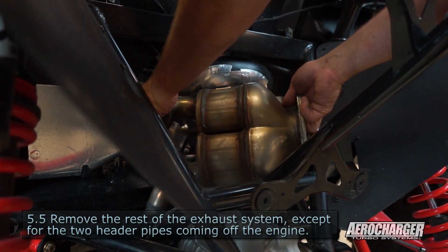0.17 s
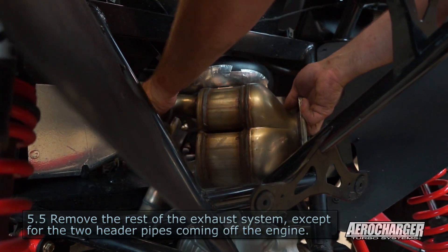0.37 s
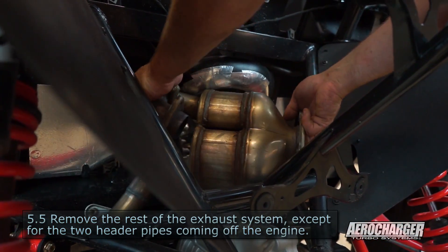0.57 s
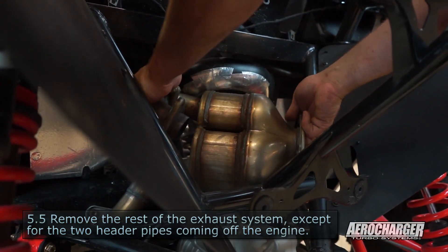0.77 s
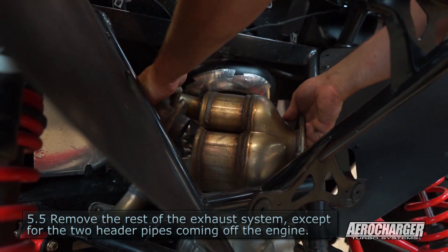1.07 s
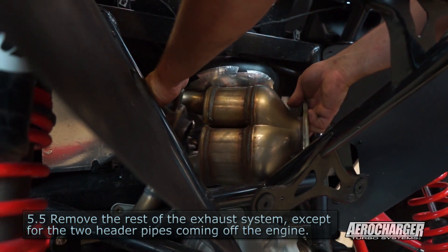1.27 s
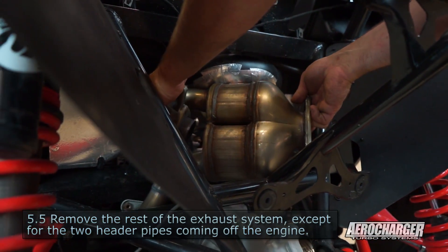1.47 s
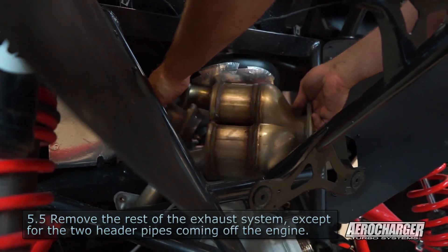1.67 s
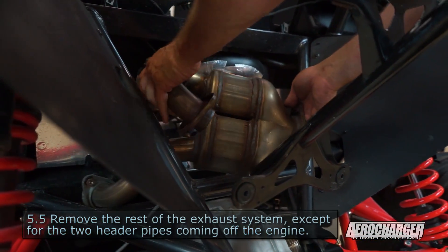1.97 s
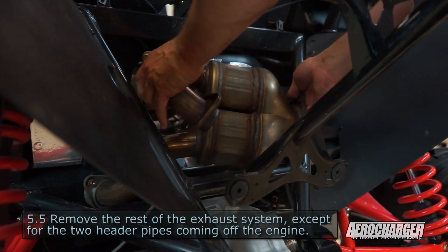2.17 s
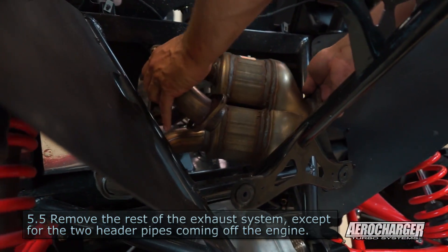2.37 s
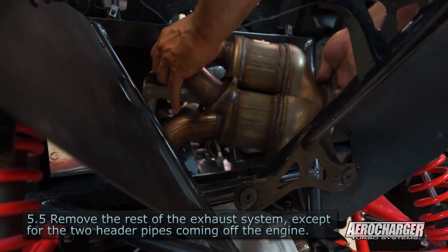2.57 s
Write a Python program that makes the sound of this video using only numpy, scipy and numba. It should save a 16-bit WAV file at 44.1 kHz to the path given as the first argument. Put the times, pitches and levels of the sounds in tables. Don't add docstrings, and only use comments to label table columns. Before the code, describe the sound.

A hollow steel exhaust clanks and scrapes against a metal frame in a quiet garage, loudest around half a second, one and two seconds, with short dull rings, close microphone, faint room tail and low hum.

```python
import sys
import numpy as np
from scipy import signal
from scipy.fft import rfft, irfft
from scipy.io import wavfile
from scipy.ndimage import uniform_filter1d
from numba import njit

SR = 44100
rng = np.random.default_rng(int(sys.argv[2]) if len(sys.argv) > 2 else 0)


def bounce(signal):
    frames = np.transpose(np.atleast_2d(signal))
    limited = np.clip(frames, -1, 1)
    pcm = np.round(limited * 32767).astype(np.int16)
    wavfile.write(sys.argv[1], SR, pcm)


def linear_from_db(decibels):
    return 10 ** (np.asarray(decibels, float) / 20)


N = 121275

# [f/Hz, level/dB per Hz]
AIR_COLOUR = [
    (25, 4),
    (60, 2.5),
    (118, 8),
    (220, -3),
    (700, -18),
    (1500, -33),
    (5000, -23),
    (16000, -38.5),
]
# [t/s, length/s, stick-slip level/dB, hiss level/dB]
SLIDES = [(0.134, 0.073, -46, -56), (0.411, 0.17, -43.5, -53.5), (1.065, 0.34, -42.5, -62),
          (1.162, 0.37, -48, -74), (1.542, 0.16, -45.5, -81), (1.843, 0.2, -51.5, -55.5),
          (1.931, .1, -51.5, -73), (2.29, 0.17, -43.5, -73), (0.495, .17, -28.5, -62),
          (2.043, 0.19, -39, -64), (-.06, 0.16, -55.5, -81), (0.622, 0.25, -51, -70),
          (0.884, 0.24, -51.5, -66), (1.31, 0.58, -65, -63), (1.659, 0.25, -51.5, -63)]
# [t/s, level/dB, decay/s, centre f/Hz]
GRIT_TICKS = [
    (.055, -55, .008, 9000),
    (.973, -44.5, .008, 12000),
    (1.713, -45, .005, 7000),
    (1.722, -38, .007, 13000),
    (1.746, -39, .006, 9000),
    (1.885, -54, .012, 14000),
    (2.365, -61, 0.0041, 13000),
    (2.7246, -53, .012, 11000),
]
# [t/s, peak level/dB, treble level/dB against the whole, chatter/s, favoured f/Hz]
EARLY_CLINKS = [(0.1029, -28, -27.5, 0.011, 1250), (0.2028, -16, -24, 0.024, 1230),
                (0.2206, -15.5, -12.5, 0.025, 1210), (0.231, -13.5, -22.5, 0.0036, 1320),
                (0.2567, -17, -22, 0.0035, 1160), (0.3278, -15.5, -21, 0.0049, 1430),
                (0.476, -16, -21.5, 0.033, 1620), (0.5026, -7, -23, 0.049, 1420),
                (0.5193, -8, -16, 0.037, 1300), (0.5399, -2.5, -19.5, 0.023, 1260),
                (0.5982, -8, -17, 0.025, 1070), (0.6179, -10, -16.5, 0.0075, 1830),
                (0.932, -23, -24, 0.0067, 1310), (0.9849, -19, -24.5, 0.01, 2940),
                (1.1318, -5, -15, 0.014, 1710), (1.1664, -6.5, -19.5, 0.021, 4660),
                (1.2383, -16, -25, 0.016, 1970), (1.2977, -18.5, -21.5, 0.0044, 1415)]
LATE_CLINKS = [(1.4868, -17.5, -18.5, 0.0018, 4540), (1.5076, -10, -20, 0.019, 1230),
               (1.5287, -10, -17, 0.012, 4270), (1.5892, -29, -25, 0.002, 1720),
               (1.687, -23.5, -27, 0.013, 2000), (1.7309, -19, -21, 0.006, 1320),
               (1.7611, -15.5, -21.5, 0.0056, 2500), (1.7712, -12, -24.5, 0.021, 1440),
               (1.866, -22.5, -26.5, 0.015, 1390), (1.951, -27.5, -27, 0.0095, 1440),
               (2.0147, -26, -31.5, 0.0086, 1350), (2.1198, -6.5, -12.5, 0.0097, 3200),
               (2.3042, -14.5, -17.5, 0.0086, 1930), (2.7228, -44, -4.5, 0.0069, 3200)]
# [t/s, peak level/dB, treble level/dB against the whole, chatter/s, favoured f/Hz]
TOUCHES = [(2.069, -29.5, -46.5, 0.016, 1240), (2.0845, -7, -15, 0.0024, 1140),
           (2.0867, -3, -12, 0.0031, 1710), (2.091, -5, -13.5, .006, 3280), (2.1, -4.5, -18.5, 0.011, 1270),
           (2.112, -10, -16.5, .008, 1750), (2.148, -9.5, -18, 0.028, 3120),
           (2.175, -16, -27.5, 0.019, 1290), (2.189, -22, -15, 0.037, 2840), (2.215, -24, -15, .012, 3300),
           (2.284, -26, -14, 0.015, 3180), (2.291, -28.5, -24, 0.0069, 1860), (2.328, -26, -24, 0.01, 1270),
           (2.4525, -20.5, -8.5, 0.008, 2200), (2.4549, -22, -25.5, 0.005, 1620),
           (2.459, -18.5, -17.5, 0.016, 3200), (0.876, -20.5, -30, 0.0084, 2230),
           (0.5454, -13.5, -5.5, 0.0077, 4320), (0.559, -9.5, -34, 0.017, 1210),
           (1.9805, -36, -35, 0.0038, 1690), (1.9971, -25, -31.5, 0.014, 3270),
           (1.491, -20, -34, 0.011, 2840), (1.872, -22.5, -25, 0.003, 3200), (0.468, -28.5, -25, .01, 1520)]
# [level/dB, t60/s]
CANISTER_HZ = [1192, 1268, 1296, 1330, 1556, 1655, 1825, 2235, 2311, 2435, 2918, 2893, 3225, 2963]
CANISTER_RING = [(-5.5, 0.13), (-3, 0.084), (-6.5, 0.16), (-4.5, 0.077), (-8, 0.12), (0.5, 0.078),
                 (-2, 0.14), (-7, 0.14), (-14.5, 0.15), (-10, 0.23), (-11.5, 0.19), (-11.5, 0.18),
                 (-5, 0.092), (-12, 0.21)]
# [level/dB, t60/s]
PIPES_HZ = [2509, 3620, 4245, 4320, 4573, 5024, 6200, 6592, 6700, 8425, 8560, 7986, 9496, 4987]
PIPES_RING = [(-17.5, 0.19), (-18, 0.11), (-17.5, 0.12), (-6.5, 0.17), (-16, 0.32), (-22.5, 0.83),
              (-27.5, 0.4), (-20.5, .22), (-19.5, 0.26), (-30, 0.081), (-15.5, 0.1), (-37, 0.17),
              (-21, 0.2), (-29, 0.21)]
# [f/Hz, level/dB]
SHEET_COLOUR = [(300, -24), (1200, -12), (2000, -20), (3300, -13.5), (5000, -18), (9500, -23.5),
                (12000, -30), (16000, -40)]
# [t/s, level/dB, f/Hz, t60/s]
PINGS = [(.104, -39, 2240, 0.14), (.329, -30.5, 4560, 0.2), (.5385, -8, 586, 0.048),
         (.879, -32, 2285, 0.098), (.986, -24, 1652, 0.14), (1.145, -18.5, 1815, .16),
         (2.13, -22.5, 1269, 0.34), (2.4525, -24.5, 2246, 0.14), (2.454, -28.5, 2925, 0.23),
         (2.455, -25.5, 1303, 0.14), (2.7246, -49.5, 3140, 0.071)]
# [t/s, peak level/dB, chatter/s, favoured f/Hz]
BUMPS = [(0.22, -14, 0.026, 546), (0.259, -19.5, 0.072, 215), (0.503, -7, 0.015, 280),
         (0.519, -8, 0.0059, 177), (0.539, -4, 0.0052, 567), (0.599, -19.5, 0.036, 355),
         (0.878, -28, 0.078, 430), (0.933, -15.5, 0.033, 490), (1.133, -5, 0.014, 532),
         (1.169, -11, 0.06, 460), (1.239, -20, 0.046, 392), (1.488, -27, 0.009, 353),
         (1.507, -11.5, 0.026, 670), (1.711, -20.5, 0.019, 240), (1.761, -16.5, 0.046, 184),
         (1.946, -22, 0.07, 191), (2.083, -20.5, 0.052, 700), (2.306, -14, 0.026, 867),
         (2.329, -35, 0.025, 537), (2.369, -19.5, 0.077, 127), (0.679, -28, .06, 205), (.76, -32, .06, 210),
         (1.142, -9.5, 0.016, 278), (1.776, -23.5, 0.0086, 597)]
# [f/Hz, level/dB, t60/s]
FRAME_MODES = [(127, -9.5, 0.51), (190.5, -4, 0.16), (244, -2, 0.088), (278.7, -5.5, 0.13), (370, -8, 0.1),
               (417.3, -8, 0.17), (480.2, -4, 0.06), (542.6, -6, 0.087), (584, -15, 0.11), (639, 0, 0.039),
               (755, -5, 0.086), (827, -3, 0.047), (332, -10, 0.089)]
# [t/s, share of ringing left, length/s]
MUTES = [
    (2.126, 0.74, 0.0031),
    (2.23, 0.55, 0.0069),
    (3, .45, .004),
    (1.8, 0.65, 0.008),
    (0.48, 1, 0.0092),
    (1.553, 0.61, 0.0058),
    (0.672, 0.7, 0.03),
    (1.785, 0.82, .004),
    (.91, 1, 0.013),
]

AIR_DB, HUM_HZ, HUM_DB = -49, 123, -73
DRAG_PER_S, GRAIN_DB = 4000, 2
DRAG_DB, DRAG_FRAME_DB = -32, -26.5
CLINK_DB, BUMP_DB = -18, -14.5
CHATTER_PER_S, CHATTER_DB, RISE_S = 5000, 2.5, 0.00017
TOUCH, TOUCH_SAMPLES = 6, 2
SPOT_DB, SPOT_OCTAVES, SCATTER_DB = 8, 0.21, 3.5
USUAL_TREBLE_DB, TREBLE_HZ = -21.5, 2840
CRASH = 0.21
TWIN_SHARE, TWIN_DB, TWIN_T60 = 0.0097, -4.5, 0.52
SHEET_T60_S, SHEET_DAMP = 0.099, 0.14
JOLT_DB, JOLT_HZ = -29, 33
PING_RISE_S = 0.0012
BASS_CUT_HZ = 119
ROOM_DB, ROOM_T60_S, ROOM_HZ = -20.5, 0.54, 5200


def colour(x, points):
    hz, db = np.array(points, float).T
    bins_hz = np.maximum(np.fft.rfftfreq(len(x), 1 / SR), 1)
    gain = linear_from_db(np.interp(np.log(bins_hz), np.log(hz), db))
    return irfft(rfft(x) * gain, len(x))


def unit(x):
    return x / np.sqrt(np.mean(x ** 2))


def garage():
    t = np.arange(N) / SR
    air = linear_from_db(AIR_DB) * unit(colour(rng.standard_normal(N), AIR_COLOUR))
    waver = unit(uniform_filter1d(rng.standard_normal(N), SR // 8))
    return air + linear_from_db(HUM_DB + 2 * waver) * np.sin(2 * np.pi * HUM_HZ * t)


def clicks(shape, per_s):
    u = rng.random(shape + (2,))
    chance = per_s / SR
    sign = np.where(u[..., 0] < chance / 2, 1, -1)
    size = linear_from_db(-CHATTER_DB * np.log(1 - u[..., 1]))
    return size * sign * np.clip((chance - u[..., 0]) * 1e5, 0, 1)


def drag():
    start, length, db, hiss_db = np.array(SLIDES, float).T[..., None]
    hump = np.sin(np.pi * np.clip((np.arange(N) / SR - start) / length, 0, 1))
    grain = linear_from_db(GRAIN_DB * unit(uniform_filter1d(rng.standard_normal(N), SR // 100)))
    hiss_colour = [(3000, -16), (6000, -3), (10000, 7), (15000, -4), (16000, -12)]
    hiss = unit(colour(rng.standard_normal(N), hiss_colour))
    ticks = grain * (hump * linear_from_db(db)).sum(0) * unit(clicks((N,), DRAG_PER_S))
    return ticks, (hump * linear_from_db(hiss_db)).sum(0) * hiss


def grit():
    out, t = np.zeros(N + SR // 10), np.arange(SR // 10) / SR
    for s, db, decay, hz in GRIT_TICKS:
        puff_colour = [(hz / 4, -30), (hz / 1.6, -6), (hz, 0), (hz * 2, -8)]
        puff = unit(colour(rng.standard_normal(len(t)), puff_colour))
        first = int(s * SR)
        out[first:first + len(t)] += linear_from_db(db) * puff * np.exp(-t / decay)
    return out[:N]


def chatter(length_s):
    t, fade_s = np.arange(SR // 10) / SR, np.clip(length_s, .002, .06)[:, None]
    x = clicks((len(fade_s), len(t)), CHATTER_PER_S)
    x = x * (1 - np.exp(-t / RISE_S)) * np.exp(-(t / fade_s) ** 0.76)
    x[:, 8:8 + TOUCH_SAMPLES] += TOUCH * np.hanning(TOUCH_SAMPLES + 2)[1:-1] / 1.71
    return x / np.sqrt(np.sum(x ** 2, axis=1, keepdims=True))


@njit
def ring(starts, pushes, gains, steady, steady_gain, poles, left):
    n, out = len(steady), np.zeros(len(steady))
    for m in range(len(poles)):
        x, z = steady * steady_gain[m], 0j
        for e in range(len(starts)):
            k = min(pushes.shape[1], n - starts[e])
            x[starts[e]:starts[e] + k] += gains[e, m] * pushes[e, :k]
        for i in range(n):
            z = z * poles[m] * left[i] + x[i]
            out[i] += z.imag
    return out


def body(modes, s, db, length_s, spot_hz, treble_db, steady, tuned, left):
    hz, mode_db, t60 = np.array(modes, float).T
    chance = rng.standard_normal((len(s) + 1, 2, len(hz)))
    octaves = np.log2(hz / spot_hz[:, None])
    where = SPOT_DB * np.exp(-(octaves / SPOT_OCTAVES) ** 2) + SCATTER_DB * chance[1:, 0]
    slope = np.clip(np.log2(hz / TREBLE_HZ) / 1.44, -.5, 1.7)
    tilt = (treble_db[:, None] - USUAL_TREBLE_DB) * slope
    tilt = tilt + CRASH * (db - db.max())[:, None] * (np.arange(len(hz)) >= tuned)
    poles = np.exp(2j * np.pi * hz / SR - np.log(1000) / (np.maximum(t60, .01) * SR))
    sign = np.sign(chance[:, 1])
    gains = sign[1:] * linear_from_db(db[:, None] + mode_db + where + tilt)
    starts = (s * SR).astype(np.int64)
    steady = steady + 1e-18
    return ring(starts, chatter(length_s), gains, steady, sign[0] * linear_from_db(mode_db), poles, left)


def twinned(modes, spread):
    offset = TWIN_SHARE * (rng.random(len(modes)) + 0.3)
    shift = 1 + spread * offset * np.where(rng.random(len(modes)) < .5, 1, -1)
    return modes + [(f * k, db + TWIN_DB, t60 * TWIN_T60) for (f, db, t60), k in zip(modes, shift)]


def sheet():
    u = rng.random((3, 250))
    points_hz, points_db = np.array(SHEET_COLOUR, float).T
    hz = 300 * 53 ** ((np.arange(250) + u[0]) / 250) ** .6
    db = np.interp(np.log(hz), np.log(points_hz), points_db) + 6 * (u[1] - .5)
    return list(zip(hz, db, SHEET_T60_S * (2000 / hz) ** SHEET_DAMP * (0.17 + u[2])))


def exhaust(ticks):
    s, db, treble_db, length_s, spot_hz = np.array(EARLY_CLINKS + LATE_CLINKS + TOUCHES, float).T
    tuned = [(f, *m) for f, m in zip(CANISTER_HZ + PIPES_HZ, CANISTER_RING + PIPES_RING)]
    modes = twinned(tuned, 0.62) + sheet()
    return body(modes, s, db + CLINK_DB, length_s, spot_hz, treble_db,
                ticks * linear_from_db(DRAG_DB), 2 * len(tuned), muting())


def jolt():
    s, db = np.array(EARLY_CLINKS + LATE_CLINKS + TOUCHES, float).T[:2]
    x = np.zeros(N)
    x[(s * SR).astype(int)] = linear_from_db(db)
    band = signal.butter(2, [JOLT_HZ / 2, JOLT_HZ * 1.25], "band", fs=SR)
    return linear_from_db(JOLT_DB) * SR / JOLT_HZ / 2 * signal.lfilter(*band, x)


def pings():
    s, db, hz, t60 = np.array(PINGS, float).T[..., None]
    t = np.maximum(np.arange(N) / SR - s, 0)
    swell = linear_from_db(db) * (1 - np.exp(-t / PING_RISE_S))
    fade = np.exp(-np.log(1000) * t / t60)
    return (swell * fade * np.sin(2 * np.pi * hz * t)).sum(0)


def frame(ticks):
    s, db, length_s, spot_hz = np.array(BUMPS, float).T
    treble_db = np.full(len(s), float(USUAL_TREBLE_DB))
    return body(twinned(FRAME_MODES, 8.1), s, db + BUMP_DB, length_s, spot_hz, treble_db,
                ticks * linear_from_db(DRAG_FRAME_DB), 2 * len(FRAME_MODES), np.ones(N))


def muting():
    start, left, length = np.array(MUTES, float).T[..., None]
    t = (np.arange(N) / SR - start) / np.maximum(length, .001)
    press = np.pi / 2 * np.sin(np.pi * np.clip(t, 0, 1)) / (length * SR)
    return np.exp((np.log(np.clip(left, .05, 1)) * press).sum(0))


def room(x):
    t = np.arange(SR // 2) / SR
    tail = rng.standard_normal(len(t)) * np.exp(-np.log(1000) * t / ROOM_T60_S)
    tail = tail * np.clip(t / 0.01 - .3, 0, 1)
    tail = signal.lfilter(*signal.butter(1, ROOM_HZ, fs=SR), tail)
    return linear_from_db(ROOM_DB) * signal.fftconvolve(x, tail / np.sqrt(np.sum(tail ** 2)))[:N]


def scene():
    ticks, hiss = drag()
    metal = exhaust(ticks) + frame(ticks) + pings()
    near = signal.lfilter(*signal.butter(2, BASS_CUT_HZ, "high", fs=SR), metal) + hiss + grit()
    return (near + room(near) + jolt() + garage())[None]


def band_limit(x):
    return signal.sosfilt(signal.butter(12, 16820, fs=SR, output="sos"), x)


def record(dry):
    rounded = np.tanh(dry / 0.98) * 1.116
    top_cut = signal.ellip(8, .3, 45, 15900, fs=SR, output="sos")
    return band_limit(signal.sosfilt(top_cut, rounded))


dry = scene()
out = record(dry)
bounce(out)
```